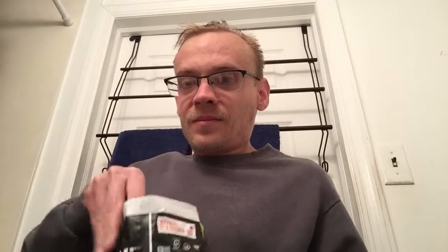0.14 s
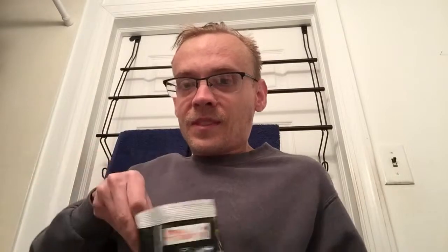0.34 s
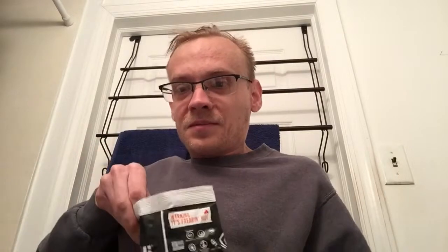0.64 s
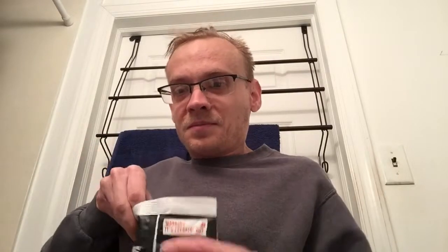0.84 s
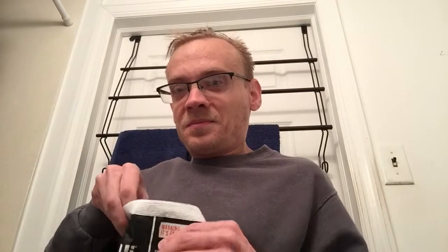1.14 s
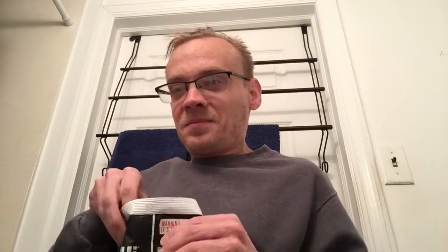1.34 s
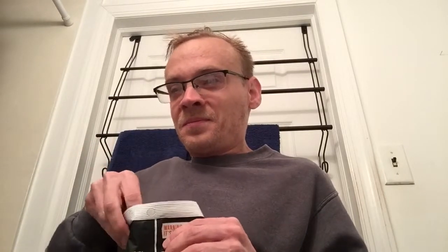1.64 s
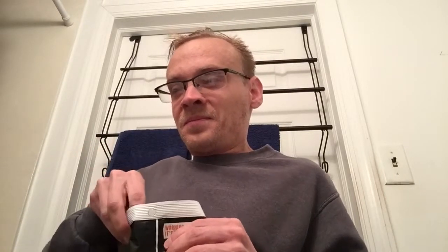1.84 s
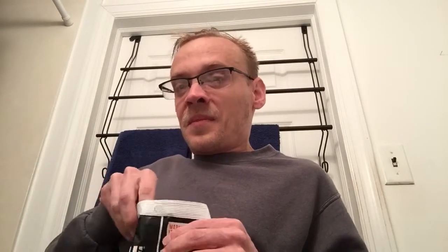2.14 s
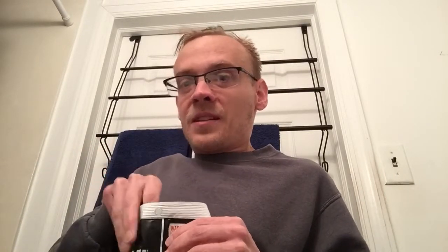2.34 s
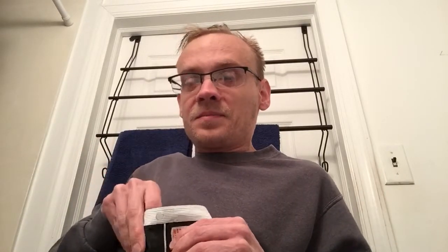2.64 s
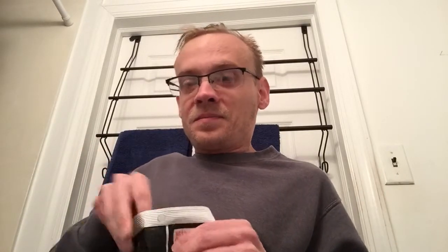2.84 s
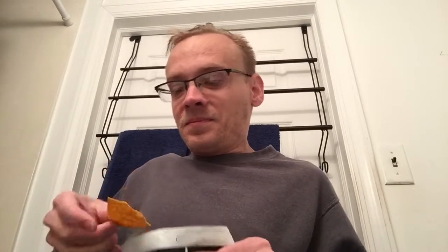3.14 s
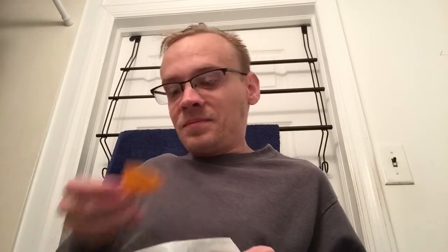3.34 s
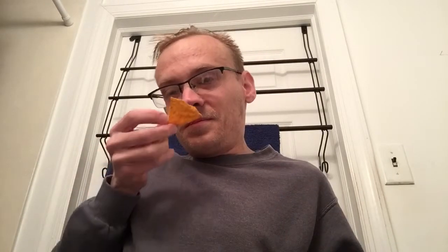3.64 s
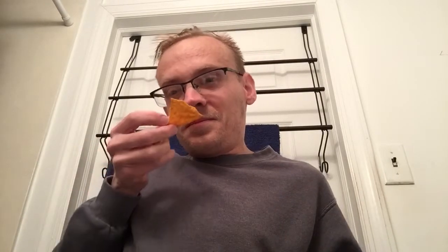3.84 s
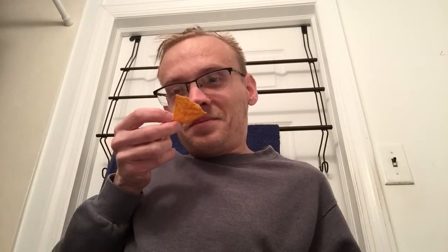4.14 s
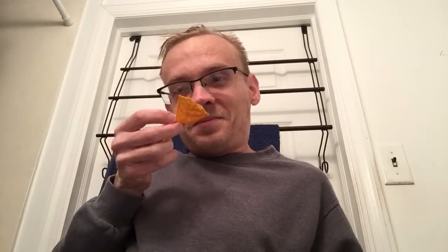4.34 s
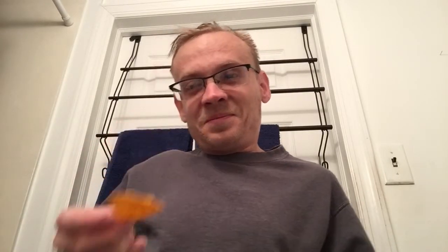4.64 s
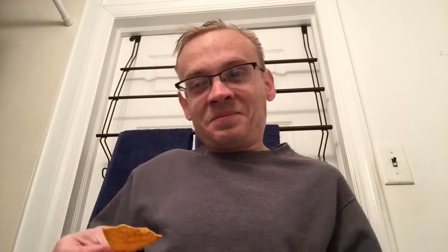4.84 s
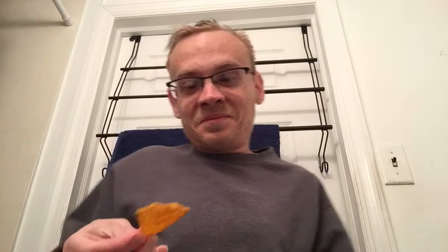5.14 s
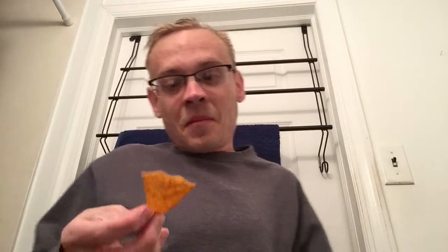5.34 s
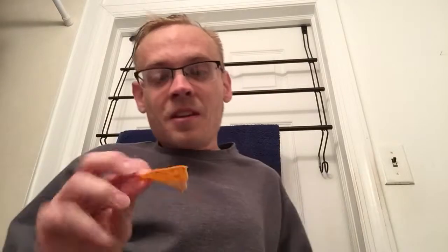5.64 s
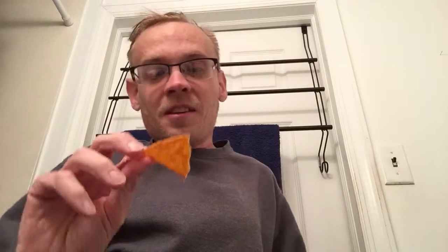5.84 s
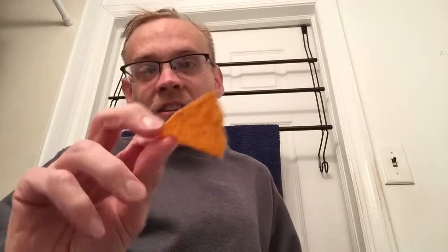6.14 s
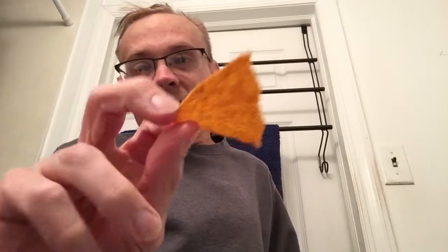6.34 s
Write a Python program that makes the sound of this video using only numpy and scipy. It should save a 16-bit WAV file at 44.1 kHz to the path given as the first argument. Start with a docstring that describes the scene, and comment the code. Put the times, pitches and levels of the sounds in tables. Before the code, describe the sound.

A hand rummages in a crinkly foil snack bag, with sharp crackles and chips rattling inside, in a small room.

```python
"""Rummaging in a foil snack bag

A small hard-walled room, a laptop microphone close to the bag. As a hand digs about, creases in the
foil snap one by one over a rustle of tiny crackles, and chips knock the hollow bag.
The walls answer every snap with a short bright tail over a low room hum."""
import sys
import numpy as np
from scipy import signal
from scipy.fft import rfft, irfft, next_fast_len
from scipy.io import wavfile

SR = 44100
rng = np.random.default_rng(int(sys.argv[2]) if len(sys.argv) > 2 else 0)


def put_to_file(sound):
    """Save the sound as 16-bit audio at rate SR, in the file named by the first command-line argument."""
    columns = np.atleast_2d(sound).T  # one column per channel
    safe = np.clip(columns, -1, 1)
    whole_steps = np.round(safe * 32767)
    wavfile.write(sys.argv[1], SR, whole_steps.astype(np.int16))


N = 286209
RUSTLE, RATTLE, PUSH = range(3)  # what the hand drives: foil, chips, the bag's walls


def snaps():
    """Each crease lets go in a click that carries a brief narrow ring; returns far and near sound."""
    # start_s, level_db, tilt_db_per_octave, rounding_db_per_octave2, hollow_db, ring_hz, ring_db
    creases = [(0.0256, -17, -6.5, 1, -7.5, 4400, 7), (0.088, -23.5, -6, 3.5, -3, 660, 11),
               (0.1275, -18.5, -4, -0.65, -3.5, 2670, 14), (0.2992, -13, -7, 3.5, -11, 1950, 0),
               (0.3405, -33, 1.5, -2.2, 5, 8400, 10.5), (0.373, -4.5, 0, 1.0, -1, 3870, 1),
               (0.4295, -8.5, -1.2, 1, 7, 2450, 9), (0.4755, -8, -3, 1.1, 2.5, 2030, 3),
               (0.595, -15, -1.5, -0.1, -9, 4410, 7), (0.7089, -2, -1, 1.4, -8.5, 1810, 2),
               (0.7657, -13.5, -3, 0.1, 8.5, 8490, -1), (0.7844, -10, 1.5, 0.5, -6, 8400, 6.5),
               (0.874, -7.5, -7, 1.5, -7, 576, 5.5), (0.901, -11.5, -6.5, 0, -5.5, 600, 3),
               (0.9917, -3.5, 1.1, 1.9, -2, 1440, 6), (0.997, -15, 0, 1.5, 12, 1325, 3),
               (1.021, -2, -4, 0.9, 3.5, 1190, 3.5), (1.034, -8.5, -0.5, -0.8, 12, 12790, 6.5),
               (1.1421, -4.5, -2, -1.16, -7, 12790, 4), (1.1599, -17, -3, 4, 9, 1110, 8),
               (1.1957, -10, 0, 0.8, 0, 4410, 8), (1.2075, 0, -3.8, 4, -16, 4530, 2),
               (1.2114, -11, 0.1, -0.2, -1, 8900, 9.5), (1.3424, -24, 1.5, -0.7, -5, 8490, 2),
               (1.4076, -4.5, -2.6, 0, -10, 11900, 5.5), (1.4661, -13.5, -4, 1, -4, 2680, 6),
               (1.525, -18, 1.9, 1.5, 6.5, 3080, 12), (1.6467, -11, -1.9, 0.06, 8, 3840, 11),
               (1.782, -20, -1.8, 0.6, 8, 1170, 2.5), (1.8623, -24, 1.5, 0.3, -4, 5700, 9),
               (1.903, -24, -2, -0.5, -3, 1400, 11), (1.9168, -26, -7.5, -0.5, 8, 760, 4),
               (1.9982, -15.5, 0.2, -1.6, 9.5, 2800, 16.5), (2.058, -21, -8, 1.5, 6.5, 1217, 9.5),
               (2.1457, -17.5, -1.5, 0.1, -4, 4700, 9), (2.1605, -21, 0, -0.9, 3, 4200, 7),
               (2.184, -13.5, 2, 4.5, -2, 4160, 1), (2.2106, -11.5, -0.6, -0.45, 4.5, 5640, 9),
               (2.3247, -20, -5.5, 0.3, 5, 1220, 7), (2.347, -12.5, -4.5, 1.5, -2, 8500, 15),
               (2.411, -7, 3.8, 1.9, 5, 8000, 3.5), (2.4208, -17, -4, -1.9, -2, 8490, 1),
               (2.4654, -8, -3.0, 0, 0, 4500, 6.5), (2.611, -25, -2, 3, 3, 1980, 4),
               (2.636, -21.5, -4, 0, 3.5, 1910, 9), (2.68, -27.5, -10.5, 3.5, 9, 700, 15.5),
               (2.695, -22, -2.5, 0.5, -3, 1250, 5.5), (2.714, 3.5, -1.1, 0.73, 3, 1195, 6),
               (2.726, -10, 2.2, -0.2, 14, 1260, 5), (2.886, -31, 2.3, 0, 11, 13000, 2),
               (2.9158, -6, 1.5, -0.06, 4.5, 1180, 0), (2.963, -25, -7.5, 2.5, 4.5, 1525, 16.5),
               (3.1228, -26.5, 3.5, 0.5, -14, 8800, 4), (3.1467, -8.5, -5, 0, -2.5, 1430, 9),
               (3.2243, -35, -6, -0.3, -2, 8630, 5), (3.298, -21, 0, 2.5, 7, 3090, 10.5),
               (3.3944, -21.5, -12, 3.5, 2.5, 2050, 14.5), (3.5057, -33, -2, -1.5, 1, 8780, 4),
               (3.5348, -11.5, 3.8, 2.8, 11, 6900, 5.5), (3.6086, -25, 4.5, 0.9, 3, 12580, 1.5),
               (3.654, -9, 0.85, -0.8, 2.5, 4500, 9.5), (3.7411, -14.5, -2.3, 1, 1, 1530, 10),
               (3.787, -24, -3.5, -0.5, 1.5, 1200, 13), (3.8538, -40, -3.3, -1.5, 15, 1390, 9),
               (4.0234, -36, -5.5, -0.2, 10.5, 886, 11), (4.165, -11.5, 0.3, 2.5, 1.5, 5860, 13),
               (4.2335, -38.5, -9, 2, 12, 1255, 2), (4.4527, -33.5, 4, -1.4, 2, 8500, 2),
               (4.487, -20, -7.5, 3, 1, 1240, 0.5), (4.546, -17.5, -3, 1.5, 4, 1210, 5),
               (4.5556, -11, -1, -1.4, -1.5, 13200, 2), (4.897, -25.5, -4.5, -1.4, -1, 1610, 16),
               (4.941, -33, -8.5, -0.2, 9.5, 1150, 12), (4.957, -16.5, -0.7, -1.6, 4, 7850, 7),
               (5.049, -19.5, -1.5, 1.5, -4, 2000, 13.5), (5.1234, -18.5, 0.9, 0, 5, 7800, 4),
               (5.234, -14.5, -1, 3.6, 10, 1120, 15.5), (5.4997, -33.5, -1.5, 1.0, 1, 8090, 8),
               (5.5517, -22.5, 3, 0.8, -20, 9200, 9), (5.6601, -33, -5, 0.5, -3, 2100, 20),
               (5.6885, -35.5, -7, 0.3, -7, 2025, 16.5), (6.2462, -26, -3.5, 0, 6.5, 1155, 12),
               (6.2553, -29.5, -7, 1, 13, 1200, 9)]
    # a crease is too small for bass: frequency_hz, level_db
    bass_loss = [(120, -33), (300, -6.5), (500, -3), (750, -1)]
    body_hz, middle_hz, top_hz = 500, 2500, 12000  # the tilt pivots on the middle, between body and top
    hollow_hz, hollow_spread, ring_spread = 1210, 0.41, 0.08  # spreads in log frequency
    slip_db, bright_t60_s, far_slip_share = -10, 0.0072, 0.15  # small after-slips trail each click
    size = 1024
    far, near = np.zeros((2, N + size))
    t, hz = np.arange(size) / SR, np.abs(np.fft.fftfreq(size, 1 / SR))
    octaves = np.log2(np.clip(hz, body_hz, top_hz) / middle_hz)
    for start_s, level_db, tilt, rounding, hollow_db, ring_hz, ring_db in creases:
        shape_db = level_db + tilt * octaves - rounding * octaves ** 2 + value_at(bass_loss, hz)
        shape_db += hollow_db * np.exp(-(np.log((hz + 1) / hollow_hz) / hollow_spread) ** 2)
        shape_db += ring_db * np.exp(-(np.log((hz + 1) / ring_hz) / ring_spread) ** 2)
        # minimum phase: nothing rings before the click
        spectrum = np.exp(np.conj(signal.hilbert(np.log(gain_of(shape_db)))))
        t60_s = bright_t60_s * gain_of(np.clip(-1.2 * tilt, 0, 12))  # a dull, soft fold gives way slowly
        noise = rng.standard_normal(size)
        slips = noise * np.abs(noise) * gain_of(slip_db - 60 * t / t60_s)
        for out, share in (far, far_slip_share), (near, 1):
            train = np.append(1, share * slips[1:])
            train /= np.linalg.norm(train)
            out[round(start_s * SR):][:size] += np.fft.ifft(spectrum * np.fft.fft(train)).real
    return far[:N], near[:N]


def rustle():
    """The foil crackles under the hand: tiny pings at six pitches."""
    # colour of the rustle: frequency_hz, level_db
    colour = [(880, -36), (1500, -4), (3580, 0), (4450, 0), (7650, -3.5), (8530, -3), (12900, -5),
              (15900, -12)]
    t = np.arange(200) / SR
    crackle = np.zeros(N)
    for k, pitch_hz in enumerate(np.geomspace(1500, 14000, num=6)):
        ping = np.sin(2 * np.pi * pitch_hz * t) * np.exp(-t * pitch_hz / 0.84)
        ping /= np.linalg.norm(ping)
        crackle += signal.oaconvolve(clicks(per_s=300, spread_db=5), ping)[:N] * 1.77 ** k
    return gain_of(-4) * hand(RUSTLE) * unit_rms(coloured(crackle, colour))


def rattle():
    """Chips knock the hollow bag; the hand pushes its slack walls into low thumps."""
    # resonances of the hollow bag: pitch_hz, width_hz, level_db
    bag_modes = [(422, 50, -4), (610, 160, -1), (850, 210, 0.5), (1200, 120, 1), (1610, 330, -5),
                 (2065, 1200, -13)]
    # resonances of its slack walls: pitch_hz, width_hz, level_db
    slack_modes = [(146.6, 66, 3.5), (251, 85, -0.5)]
    knocks = ring(clicks(per_s=1100, spread_db=4.5), bag_modes)
    pushes = clicks(per_s=200, spread_db=3.9)
    thumps = ring(ring(pushes, slack_modes), slack_modes)
    return gain_of(-0.5) * hand(RATTLE) * unit_rms(knocks) + gain_of(-4) * hand(PUSH) * unit_rms(thumps)


def hand(layer):
    """Gain of one layer over time: squeezes press, hold and relax over continuous stirring."""
    # squeezes of the bag: hold_start_s, hold_s, rustle_db, rattle_db, push_db
    squeezes = [(0.0, .02, -55, -66, -55), (0.067, 0.027, -68, -67, -53), (0.166, 0.045, -66, -65, -73),
                (0.242, 0.023, -62, -63, -57.5), (0.365, 0.12, -49, -48.5, -53.5),
                (0.607, 0.066, -48.5, -49.5, -61), (0.709, 0.087, -42, -44, -49),
                (0.883, 0.019, -58, -48, -60), (.99, 0.077, -42, -42, -45.5),
                (1.108, 0.067, -51.5, -55.5, -51), (1.171, 0.077, -39.5, -45, -49.5),
                (1.353, 0.029, -49.5, -77, -75), (1.45, 0.11, -56, -60, -61),
                (1.683, 0.036, -56, -66, -62.5), (1.758, 0.028, -47, -61, -61.5),
                (1.909, 0.013, -51.5, -57.5, -57), (2.001, 0.012, -70, -53, -53.5),
                (2.117, 0.057, -58, -63.5, -72), (2.195, 0.019, -49, -68, -61),
                (2.335, 0.14, -47, -56.5, -58), (2.448, 0.027, -66, -52.5, -49.5),
                (2.63, 0.05, -75, -61, -67), (2.704, 0.026, -48, -51.5, -43.5),
                (2.972, 0.034, -62, -57.5, -58), (3.131, 0.048, -60, -56.5, -58),
                (3.237, 0.054, -71, -70.5, -66), (3.555, 0.037, -51.5, -62, -62),
                (3.637, 0.035, -48.5, -64, -60), (3.74, 0.046, -53.5, -61, -52),
                (3.844, 0.042, -73, -73, -62.5), (3.985, 0.026, -80, -71.5, -68),
                (4.24, 0.03, -87, -86, -72), (4.483, 0.038, -63.5, -59, -58),
                (4.548, 0.016, -68, -56, -43.5), (4.707, 0.015, -87, -76, -55.5),
                (4.863, 0.073, -61.5, -63, -66), (4.951, 0.048, -49, -51.5, -55),
                (5.023, 0.02, -61, -69, -73), (5.124, 0.0082, -51.5, -57, -78),
                (5.223, 0.035, -62, -53.5, -55.5), (5.405, 0.055, -86, -70.5, -67),
                (6.11, 0.042, -80, -76, -71), (6.245, 0.043, -85, -70, -59.5)]
    # the hand moving about between squeezes: time_s, level_db
    stirring = [(0.0, -59.5), (0.38, -53.5), (0.58, -51), (1.3, -50), (1.63, -59), (2.02, -68),
                (2.37, -49.5), (2.51, -57), (3.02, -54.5), (3.38, -69), (3.72, -75), (3.85, -76),
                (4.17, -76.5), (4.93, -65.5), (5.1, -76), (5.28, -71), (5.75, -77.5), (6.49, -80)]
    # shares of the stirring: rustle_db, rattle_db, push_db
    share_db = [-3.5, -9.5, -12.5]
    # fade as the grip relaxes: rustle_db_per_s, rattle_db_per_s, push_db_per_s
    relax_rates = [304, 249.5, 252]
    press_s = 0.013
    t = np.arange(0, N / SR + 0.01, 0.002)
    power = gain_of(np.interp(t, *np.transpose(stirring)) + share_db[layer]) ** 2
    for hold_start_s, hold_s, *levels_db in squeezes:
        press = np.clip((t - hold_start_s) / press_s + 1, 0, 1) ** 2
        relax_db = relax_rates[layer] * np.maximum(t - hold_start_s - hold_s, 0)
        power += (press * gain_of(levels_db[layer] - relax_db)) ** 2
    return np.interp(np.arange(N) / SR, t, np.sqrt(power))


def room(x):
    """Hard walls return a few echoes and a tail in which each band dies at its own speed."""
    # decay of the room: frequency_hz, t60_s
    decay = [(150, 0.13), (600, 0.26), (1500, 0.21), (4000, 0.22), (10000, 0.21), (16000, 0.21)]
    # echoes off the nearest walls: delay_ms, level_db
    echoes = [(3.5, -8), (8.5, -15), (12.5, -16)]
    turn_hz = 2.3  # three tails are taken in turn
    turn = 2 * np.pi * turn_hz * np.arange(N) / SR
    out = np.zeros(N)
    for k in range(3):
        hz, t, bands = signal.stft(rng.standard_normal(SR // 2), SR, nperseg=256)
        bands *= gain_of(-60 * t / value_at(decay, hz)[:, None])
        tail = signal.istft(bands, SR, nperseg=256)[1]
        tail *= 1 - np.exp(-(np.arange(len(tail)) / (0.0035 * SR)) ** 2)  # builds over a few ms
        tail *= gain_of(-0.5) / np.linalg.norm(tail)
        for delay_ms, level_db in echoes:
            tail[round(delay_ms * SR / 1000) + 9 * (k - 1)] += gain_of(level_db)  # staggered per tail
        crossfade = np.sqrt(2 / 3) * np.cos(turn + k * np.pi / 3)
        out += signal.fftconvolve(x * crossfade, tail)[:N]
    return out


def hum():
    """Steady room and microphone noise."""
    # colour of the noise floor: frequency_hz, level_db
    floor = [(26, -40.5), (45, 0), (129, -2), (182, -6), (245, -7.5), (372, -15), (578, -16.5), (1020, -25),
             (2400, -26), (3470, -31), (11800, -34.5), (15900, -33)]
    return gain_of(-69) * unit_rms(coloured(rng.standard_normal(N), floor))


def clicks(per_s, spread_db):
    """Random clicks of either sign: many small, a few large."""
    strength, polarity, chance = rng.random((3, N))
    size = gain_of(spread_db * np.minimum(-np.log(strength + 1e-9), 4))
    return unit_rms(size * np.sign(polarity - 0.5) * (chance < per_s / SR))


def ring(x, modes):
    """Sum of two-pole resonances struck by x."""
    return sum(gain_of(db) * signal.lfilter(*signal.iirpeak(hz, hz / width_hz, SR), x)
               for hz, width_hz, db in modes)


def coloured(x, curve):
    """Filters x by a curve of frequency_hz, level_db."""
    size = next_fast_len(len(x))
    gains = gain_of(value_at(curve, np.fft.rfftfreq(size, 1 / SR)))
    return irfft(rfft(x, size) * gains, size)[:len(x)]


def value_at(curve, hz):
    """Interpolates a curve on a log-frequency axis."""
    points_hz, values = np.transpose(curve)
    return np.interp(np.log(hz + 1), np.log(points_hz + 1), values)


def gain_of(db):
    """Decibels to gain."""
    return 10 ** (np.asarray(db) / 20)


def unit_rms(x):
    """Scales to rms 1."""
    return x / np.sqrt(np.mean(x ** 2) + 1e-20)


def scene():
    """The bag close up, the walls behind it and the hum underneath, in mono."""
    far_snaps, near_snaps = snaps()
    handling = rustle() + rattle()
    direct = gain_of(-1.5) * near_snaps + gain_of(-2) * handling
    reflected = room(far_snaps + gain_of(-2.5) * handling)
    return (direct + reflected + hum())[None]


def record(dry):
    """The small microphone loses the deepest bass; the highest treble is cut off."""
    low_cut_hz, high_cut_hz = 42, 16000
    low_cut = signal.butter(2, low_cut_hz, btype="high", fs=SR, output="sos")
    high_cut = signal.firwin(511, high_cut_hz, window=("kaiser", 9), fs=SR)
    return signal.oaconvolve(signal.sosfilt(low_cut, dry), high_cut[None], "same")


dry = scene()
out = record(dry)
put_to_file(out)
```